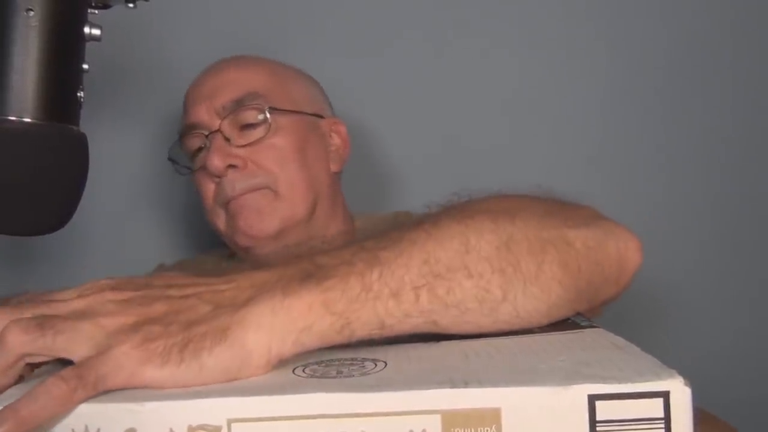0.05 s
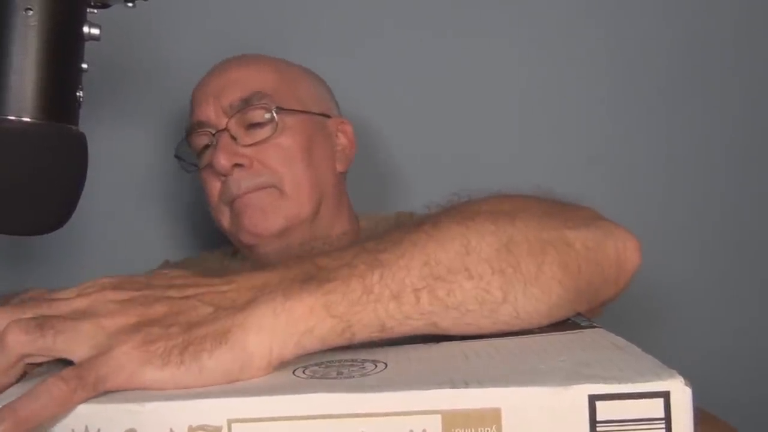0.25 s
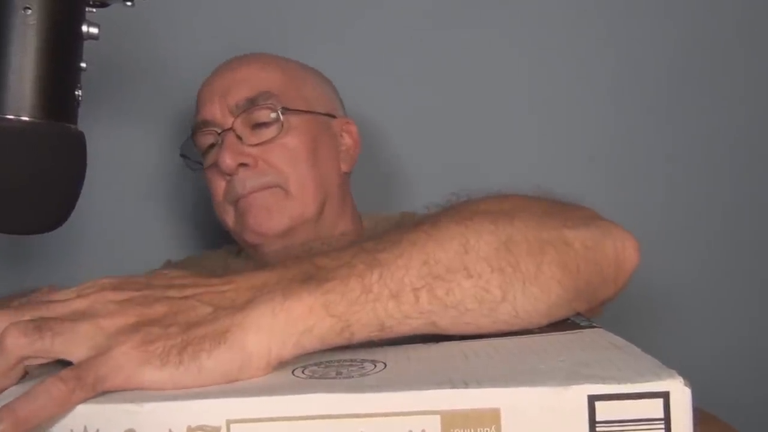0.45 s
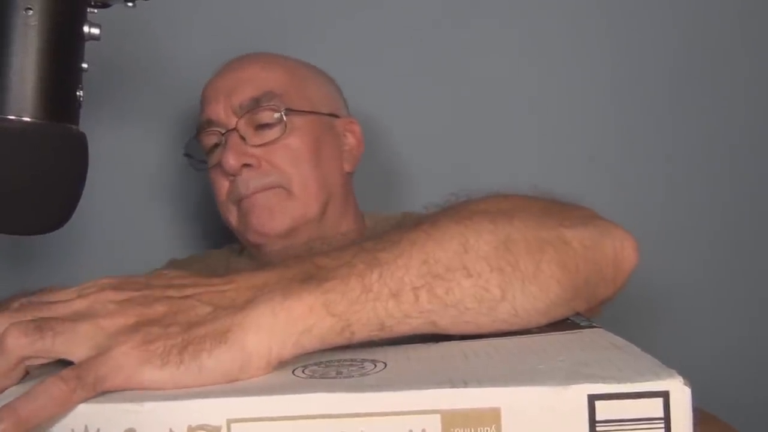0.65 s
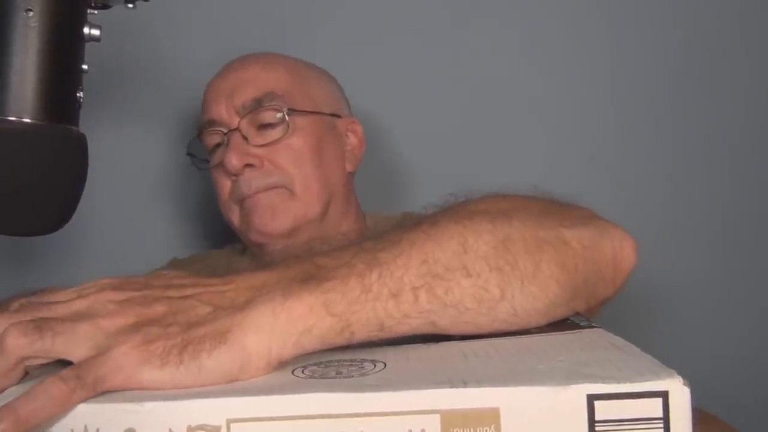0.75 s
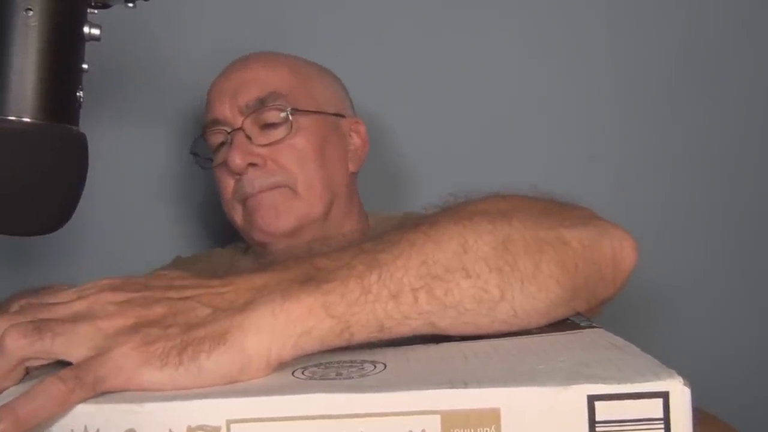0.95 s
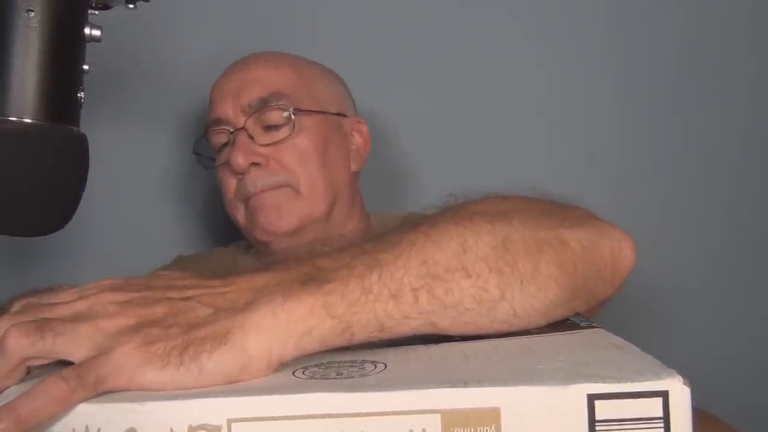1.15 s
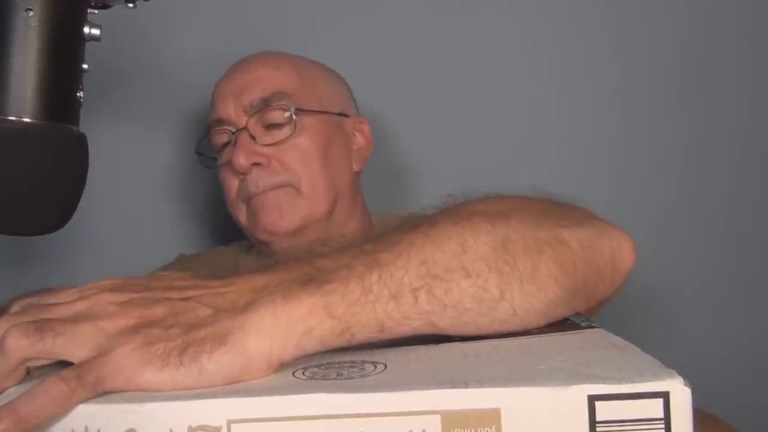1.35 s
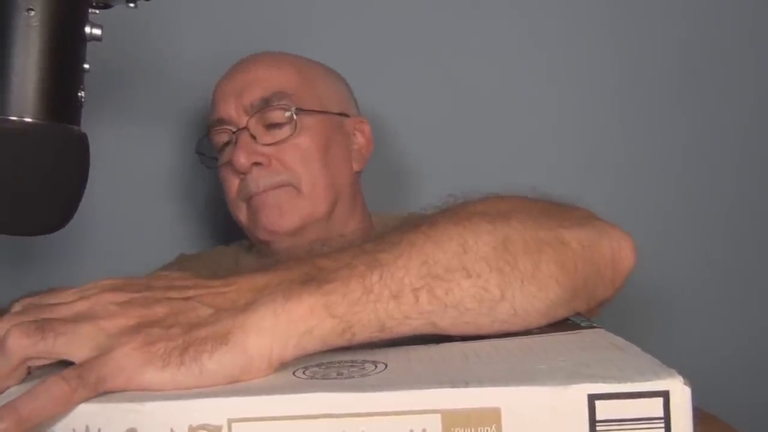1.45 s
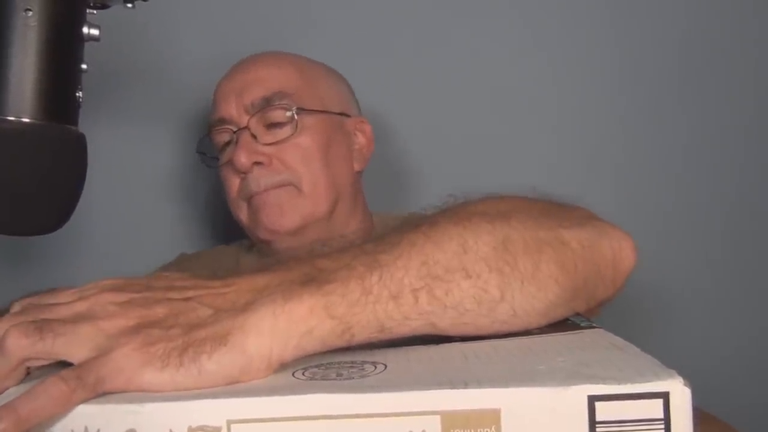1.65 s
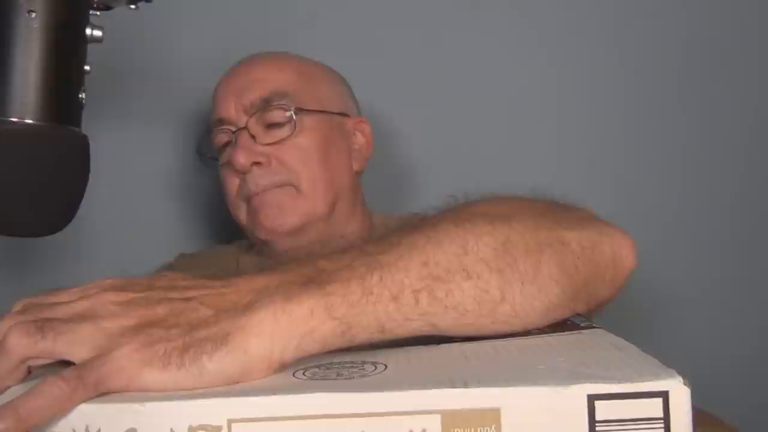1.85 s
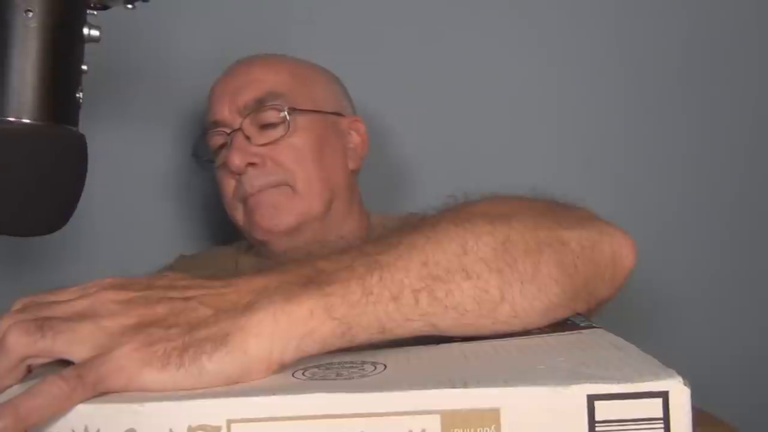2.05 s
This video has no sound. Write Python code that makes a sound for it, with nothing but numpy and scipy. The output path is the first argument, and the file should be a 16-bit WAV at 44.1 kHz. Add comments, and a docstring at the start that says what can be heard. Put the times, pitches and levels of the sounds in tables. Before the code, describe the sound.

Fingers tap and scratch a cardboard box close to the microphone in a small, quiet room. A few hollow thumps come first, then light, irregular scratching with tiny nail ticks, and softer taps at the end.

```python
"""In a small, quiet room, fingers tap and scratch a cardboard box lid close to a microphone.
Fingertips thump the hollow box, and nails crack on its stiff board. Between the taps come short
strokes, grainy because paper fibres catch and let go. Dragging fingertips stick and slip, so they
judder and groan. A nail edge rasps now and then, and there are tiny sharp ticks.
Behind it all lie a short echo, a soft room noise, a deep rumble and a faint electrical whine."""
import sys
import numpy as np
from scipy import signal
from scipy.fft import rfft, irfft
from scipy.io import wavfile

SR = 44100
rng = np.random.default_rng(int(sys.argv[2]) if len(sys.argv) > 2 else 0)


def transcribe(u):
    """Save the signal u as a 16-bit wav file named by the first command-line argument.

    u: samples, shape (n,) or (channels, n), limited to [-1, 1]; the rate is SR.
    q: integer samples, one column per channel.
    """
    v = np.clip(np.atleast_2d(u).T, -1, 1)
    q = np.round(v * 32767).astype(np.int16)
    wavfile.write(sys.argv[1], SR, q)


N = 92610
TIME = np.arange(N) / SR

# Levels set the balance between sounds; a "t60" is the time a sound takes to fade by 60 dB.
# finger taps: t/s, thump level/dB, contact time/ms, nail level/dB
FINGER_TAPS = [(.002, -32, 0.58, -34.5), (0.2385, -13, 0.59, -9), (0.241, -2, 2.16, -8.5),
               (0.261, -5.5, 1.52, -18), (0.429, -32.5, 0.76, -45), (0.4567, -23.5, 1.06, -17),
               (0.462, -9, 1.64, -24.5), (0.755, -37, 3.6, -35), (1.2204, -30, 0.47, -41.5),
               (1.422, -30, 2.7, -42), (1.579, -36.5, 0.83, -47), (1.774, -37, 1.5, -46),
               (1.8065, -43, 0.35, -49), (1.881, -41.5, 0.68, -55), (2.0039, -33.5, 0.65, -21),
               (2.0078, -22.5, 1.57, -44), (2.028, -30.5, 1.65, -47), (2.0465, -19, 2.45, -36)]
# tones the hollow box rings with: f/Hz, level/dB, t60/s
BOX_TONES = [(98, -36, 0.22), (163.6, -10, 0.039), (218, -16.5, 0.057), (265.7, -4, 0.042),
             (318.7, -18.5, 0.09), (408, -10.5, 0.092), (463.3, -10.5, 0.047), (636, -17.5, 0.074),
             (705, -18.5, 0.045), (768, -18.5, 0.076), (913, -34, 0.048), (1126, -33, 0.046)]
# tones the stiff board rings with under a nail: f/Hz, level/dB, t60/s
BOARD_TONES = [(669, -19, 0.053), (1582, -35.5, 0.15), (1707, -26.5, 0.07), (1963, -38, 0.093),
               (2470, -18, 0.035), (2690, -17.5, 0.039), (3870, -12, 0.0096), (6300, -16, 0.0064)]
# tone colour of a nail's crack: f/Hz, level/dB
CRACK_COLOUR = [(200, -32), (760, 9), (1250, 1), (2200, 2), (4400, -6.5), (6400, -5.5), (11000, -4.5),
                (16000, -10)]
# strokes across the lid: strongest at t/s, rise/s, fall/s, box level/dB, skin level/dB, nail level/dB
LID_STROKES = [(0.01, 0.08, 0.05, -48.5, -52, -87), (0.206, 0.14, 0.12, -46.5, -53.5, -58),
               (0.496, 0.073, .1, -43.5, -42, -47.5), (.535, 0.019, .03, -66, -64, -50.5),
               (.625, 0.076, 0.11, -50.5, -49, -64), (0.718, 0.044, 0.09, -43, -53.5, -53),
               (.758, 0.056, 0.039, -47.5, -53, -60), (.83, 0.044, 0.18, -54.5, -83, -68.5),
               (0.959, 0.11, 0.073, -48.5, -55.5, -63), (1.087, 0.034, 0.043, -47, -60, -60),
               (1.255, 0.088, 0.11, -51.5, -53, -59.5), (1.302, 0.062, 0.021, -45.5, -59, -54),
               (1.434, 0.04, 0.064, -49, -47, -47.5), (1.679, 0.13, 0.094, -48, -52.5, -56),
               (1.817, 0.05, 0.039, -49, -56, -57.5), (1.987, 0.087, 0.17, -44.5, -50.5, -55),
               (2.047, 0.036, 0.033, -43.5, -50, -48.5), (2.097, 0.013, 0.052, -44.5, -53, -49.5)]
# tone colour of rubbing skin: f/Hz, level/dB
SKIN_COLOUR = [(150, -15), (450, 3), (800, -1.5), (1150, -1.5), (1800, -4), (2450, -9.5), (3300, -16),
               (6000, -23), (15000, -51)]
# tone colour of a scratching nail: f/Hz, level/dB
NAIL_COLOUR = [(800, -17), (2400, 4), (4300, -1), (5300, 5), (5800, -3.5), (6400, 5), (7800, -1),
               (10000, -0.5), (12000, -7.5), (16000, -6)]
# jerky fingertip drags: start t/s, end t/s, first rate/Hz, last rate/Hz, level/dB, contact time/ms
FINGER_DRAGS = [(.0, .25, 50.3, 50.66, -39.5, 0.95), (.805, 0.866, 229, 288, -44.5, 2.5),
                (1.413, 1.476, 233, 296.4, -35, 3.5), (1.6, 1.638, 192.5, 332, -33, 2.54),
                (1.804, 1.84, 217, 288, -40.5, 2.4)]
# catches of a nail edge: t/s, half length/s, level/dB, f/Hz
NAIL_CATCHES = [(0.53, 0.021, -46.5, 2710), (0.753, .014, -49, 2260), (1.232, 0.031, -54.5, 1160),
                (1.431, 0.021, -50, 1080), (2.0075, 0.0028, -38.5, 3150), (2.095, 0.0086, -55, 2450)]
# tiny sharp ticks: t/s, level/dB, ring level on top of that/dB
TINY_TICKS = [(0.035, -34.5, -25), (0.2363, -19, -22), (.257, -18.5, -18), (0.751, -23.5, -3),
              (0.757, -20, -18), (0.766, -24, -4), (.9003, -31, -21), (0.9306, -24.5, -24),
              (1.0424, -28, 1), (1.07, -33, -10), (1.1083, -28, 0.5), (1.237, -29.5, -14),
              (1.2635, -29, -11), (1.299, -27, -9), (1.305, -33, -13), (1.4544, -18.5, -25)]
# tone colour of a tick: f/Hz, level/dB
TICK_COLOUR = [(800, -19), (2500, -7.5), (5500, -5.5), (7500, -3.5), (12000, -7), (16000, -10)]
# how long the room echoes: f/Hz, t60/s
ECHO_TIMES = [(100, 0.36), (300, 0.17), (1000, 0.41), (3000, 0.42), (8000, 0.25), (16000, 0.13)]
# tone colour of the steady room noise: f/Hz, level/dB
ROOM_NOISE_COLOUR = [(15, -8), (45, -6.5), (70, -16), (103, 9), (140, -5.5), (250, -5), (500, -22),
                     (1000, -23.5), (3000, -37), (8000, -41)]
# deep rumble that swells where the box is jolted: t/s, level/dB
RUMBLE_CURVE = [(0, -48), (.235, -49), (.27, -38), (.34, -46), (.445, -47), (.49, -36), (.56, -56.5),
                (2.1, -54)]
# faint electrical whine: f/Hz, level/dB
WHINE_TONES = [(15627, -81), (15679, -80)]


def taps():
    """Each tap pushes the box, bends the lid and sets off a short papery crack."""
    force, cracks, t = np.zeros(N), np.zeros(N), TIME[:SR // 5]
    attack = np.minimum(t / 0.0012, 1)
    shape = attack * (fade(0.015, t) + amp(-16.5) * fade(0.14, t))  # quick burst, then a weak tail
    for start, thump_db, contact_ms, nail_db in FINGER_TAPS:
        add(force, start, amp(thump_db) * press(contact_ms))
        burst = shape * rng.standard_normal(len(t))
        add(cracks, start, amp(nail_db) * soften(burst, contact_ms))
    return hollow_box(force) + lid_thud(force) + amp(-7.5) * colour(cracks, CRACK_COLOUR)


def press(contact_ms):
    """A fingertip gives one smooth push; a longer contact sounds duller."""
    t_ms = np.arange(SR // 100) / SR * 1000
    pulse = np.sin(np.pi * np.minimum(t_ms / contact_ms, 1)) ** 2
    return pulse / pulse.sum()


def soften(blow, contact_ms):
    """A longer contact takes more treble off a blow."""
    cutoff_hz = min(5620 / contact_ms, SR / 3)
    return signal.lfilter(*signal.butter(3, cutoff_hz, fs=SR), blow)


def hollow_box(force, bass_cut_hz=133.3):
    """The hollow box rings when pushed, but gives off little deep bass."""
    bass_cut = signal.butter(4, bass_cut_hz, "high", fs=SR, output="sos")
    ring = signal.sosfilt(bass_cut, ringing(BOX_TONES))
    return signal.fftconvolve(force, ring)[:N]


def lid_thud(force, start_hz=187, pitch_fall_s=0.085, peak_s=0.0083):
    """The lid gives way under a blow: a soft thud that falls in pitch."""
    t = TIME[:SR // 5]
    cycles = np.cumsum(start_hz * np.exp(-t / pitch_fall_s)) / SR
    swell = t / peak_s * np.exp(1 - t / peak_s)
    thud = swell * np.sin(2 * np.pi * cycles)
    return amp(-22.5) * signal.fftconvolve(force, thud)[:N]


def stiff_board():
    """The nail makes the stiff board ring at each tap."""
    out, ring = np.zeros(N), ringing(BOARD_TONES)
    for start, _, contact_ms, nail_db in FINGER_TAPS:
        add(out, start, amp(nail_db) * soften(ring, contact_ms))
    return out


def strokes(drop_db=19.5, roundness=1.6, pad_hz=880):
    """Each stroke swells and fades; it shakes the box, rubs with skin and scratches with the nail."""
    power = np.zeros((3, N))
    for peak, rise, fall, *levels_db in LID_STROKES:
        away = np.maximum((peak - TIME) / rise, (TIME - peak) / fall)  # 0 at the strongest moment
        swell = amp(-drop_db * np.clip(away, 0, 4) ** roundness)
        power += np.outer(amp(levels_db), swell) ** 2
    box_gain, skin_gain, nail_gain = np.sqrt(power)
    # the soft finger pad passes mostly low tones into the box
    drag = signal.lfilter(*signal.butter(1, pad_hz, fs=SR), friction())
    drone = box_gain * unit(hollow_box(drag))
    rub = colour(skin_gain * friction(), SKIN_COLOUR)
    scratch = colour(nail_gain * friction(), NAIL_COLOUR)
    return drone + rub + scratch


def friction(grains_per_s=1100, grain_share=0.56, spread_db=2, flutter_db=2, flutter_hz=92):
    """Paper fibres catch and let go: tiny clicks over a fine hiss, fluttering with the uneven grip."""
    sizes = amp(spread_db * np.minimum(rng.exponential(1, N), 4))
    grains = sizes * rng.choice([-1, 1], N) * (rng.random(N) < grains_per_s / SR)
    wobble = signal.lfilter(*signal.butter(2, flutter_hz, fs=SR), rng.standard_normal(N))
    grip = amp(flutter_db * unit(wobble))
    hiss = rng.standard_normal(N)
    return unit(grip * (np.sqrt(grain_share) * unit(grains) + np.sqrt(1 - grain_share) * hiss))


def stick_and_slip(jitter=0.0648, spread_db=0.2):
    """A dragging fingertip sticks and slips: slow jerks judder, quick ones groan."""
    force = np.zeros(N)
    for start, end, first_hz, last_hz, db, contact_ms in FINGER_DRAGS:
        now = start
        for late, size in rng.standard_normal((40, 2)):
            if now < end:
                progress = (now - start) / (end - start)
                swell = np.sqrt(np.sin(np.pi * progress))
                add(force, now, swell * amp(db + spread_db * size) * press(contact_ms))
                rate_hz = first_hz + (last_hz - first_hz) * progress
                now += np.exp(jitter * late) / rate_hz
    return hollow_box(force)


def nail_scrapes(sharpness=2.9):
    """A nail edge catches for a moment; the board rasps at a pitch that depends on the spot."""
    out = np.zeros(N)
    for middle, half_length, db, hz in NAIL_CATCHES:
        spot = signal.iirpeak(hz, sharpness, fs=SR)
        rasp = unit(signal.lfilter(*spot, signal.lfilter(*spot, friction())))
        swell = np.exp(-((TIME - middle) / half_length) ** 2)
        out += amp(db) * swell * rasp
    return out


def ticks(ring_hz=7150, ring_width_hz=1000):
    """Tiny dry snaps of noise, some with a short, rough, high ring."""
    out, t = np.zeros(N), TIME[:SR // 40]
    narrow = signal.iirpeak(ring_hz, ring_hz / ring_width_hz, fs=SR)
    for start, db, ring_db in TINY_TICKS:
        snap = 0.17 * rng.standard_normal(len(t)) * fade(0.014, t)
        ring = unit(signal.lfilter(*narrow, rng.standard_normal(len(t)))) * fade(0.0094, t)
        add(out, start, amp(db) * (snap + 0.19 * amp(ring_db) * ring))
    return colour(out, TICK_COLOUR)


def room_echo(sound, level_db=-16.5, build_up_s=0.014):
    """The furnished room adds a short, weak echo; each pitch fades at its own speed."""
    noise = rng.standard_normal(SR // 2) * np.minimum(TIME[:SR // 2] / build_up_s, 1)
    hz, t, bands = signal.stft(noise, SR, nperseg=256)
    bands = bands * fade(look_up(ECHO_TIMES, hz)[:, None], t)
    tail = signal.istft(bands, SR, nperseg=256)[1]
    return amp(level_db) * signal.fftconvolve(sound, tail / np.linalg.norm(tail))[:N]


def background(noise_db=-54, rumble_band_hz=(24, 60)):
    """Steady room noise, a deep rumble that swells after the loudest taps, and an electrical whine."""
    room_noise = amp(noise_db) * colour(rng.standard_normal(N), ROOM_NOISE_COLOUR)
    deep_band = signal.butter(2, rumble_band_hz, "band", fs=SR, output="sos")
    deep_noise = unit(signal.sosfilt(deep_band, rng.standard_normal(N)))
    rumble = amp(np.interp(TIME, *np.transpose(RUMBLE_CURVE))) * deep_noise
    whine = sum(amp(db) * np.sqrt(2) * np.sin(2 * np.pi * (hz * TIME + rng.random()))
                for hz, db in WHINE_TONES)
    return room_noise + rumble + whine


def amp(db):
    """Turns decibels into a number to multiply by."""
    return 10 ** (np.asarray(db) / 20)


def unit(sound):
    """Scales a sound to an average strength (rms) of one."""
    return sound / np.sqrt(np.mean(sound ** 2) + 1e-20)


def fade(t60, t):
    """Dies away by 60 dB every t60 seconds."""
    return np.exp(-np.log(1000) * t / t60)


def ringing(tones):
    """Pure tones that die away after one sharp blow."""
    t = TIME[:SR // 3]
    return sum(amp(db) * fade(t60, t) * np.sin(2 * np.pi * hz * t) for hz, db, t60 in tones)


def add(mix, start, sound):
    """Mixes a sound in at a start time in seconds."""
    part = mix[max(round(start * SR), 0):][:len(sound)]
    part += sound[:len(part)]


def look_up(table, hz):
    """Reads between the rows of a table, on a scale of pitch (log frequency)."""
    row_hz, values = np.transpose(table)
    return np.interp(np.log(hz + 1), np.log(row_hz + 1), values)


def colour(sound, table, size=8192):
    """Gives a sound the table's tone colour; white noise keeps its overall strength."""
    hz = abs(np.fft.fftfreq(size, 1 / SR))
    log_gain = np.log(amp(look_up(table, hz)))
    spectrum = np.exp(np.conj(signal.hilbert(log_gain)))  # so nothing rings before the sound starts
    response = np.fft.ifft(spectrum).real[:size // 2]
    return signal.fftconvolve(sound, response / np.linalg.norm(response))[:N]


def scene(right_lag_s=18.5e-6):
    """All sounds reach one microphone; the right channel lags by a hair."""
    hand = taps() + stick_and_slip() + strokes() + nail_scrapes() + ticks()
    mono = hand + stiff_board() + room_echo(hand) + background()  # the board is close and has no echo
    lag = np.exp(-2j * np.pi * np.fft.rfftfreq(N, 1 / SR) * right_lag_s)
    return np.array([mono, irfft(rfft(mono) * lag, N)])


def record(dry, top_hz=15950):
    """The recorder cuts off the very highest treble."""
    treble_cut = signal.firwin(511, top_hz, window=("kaiser", 9), fs=SR)
    return signal.oaconvolve(dry, treble_cut[None], "same")


dry = scene()
out = record(dry)
transcribe(out)
```